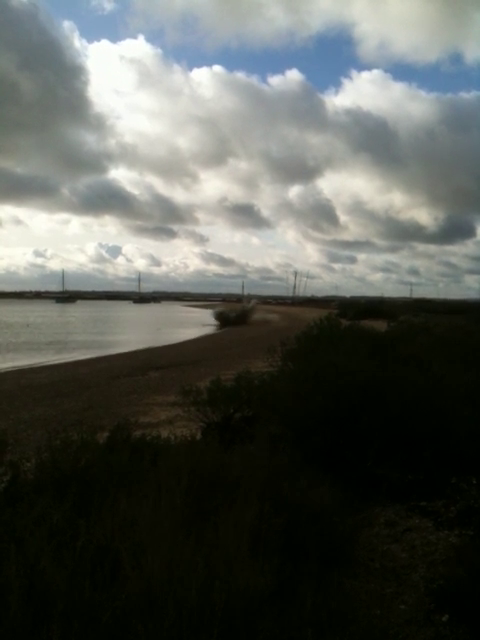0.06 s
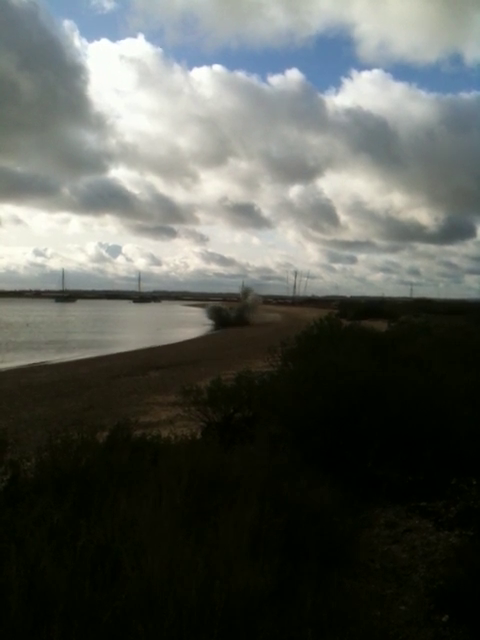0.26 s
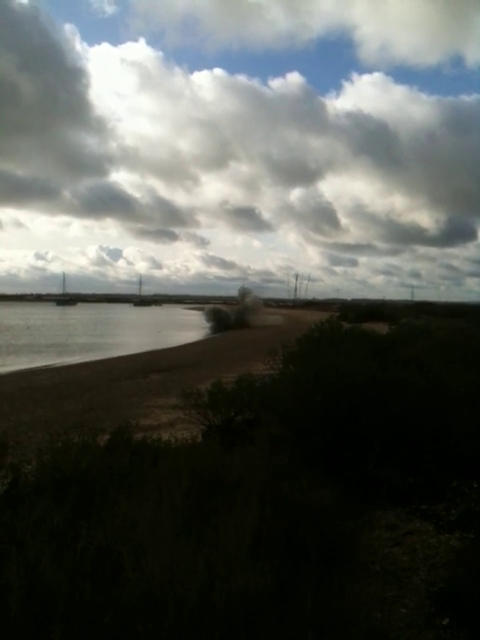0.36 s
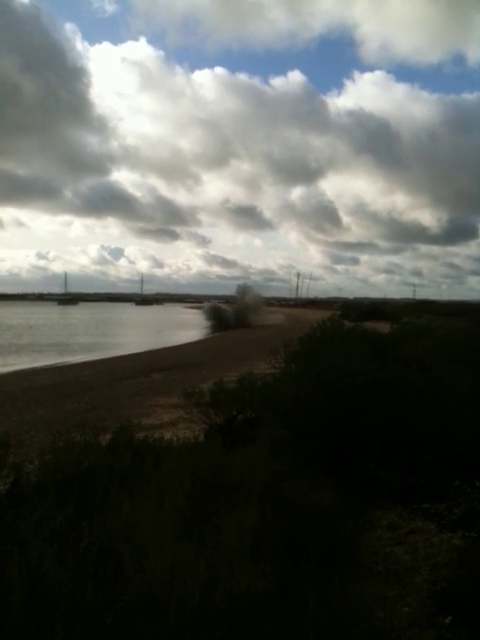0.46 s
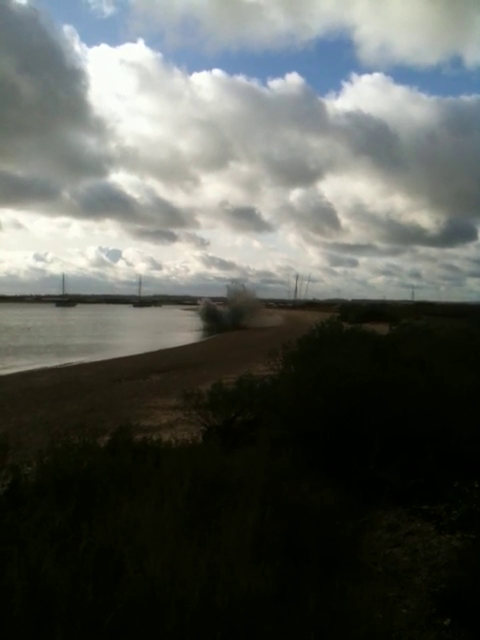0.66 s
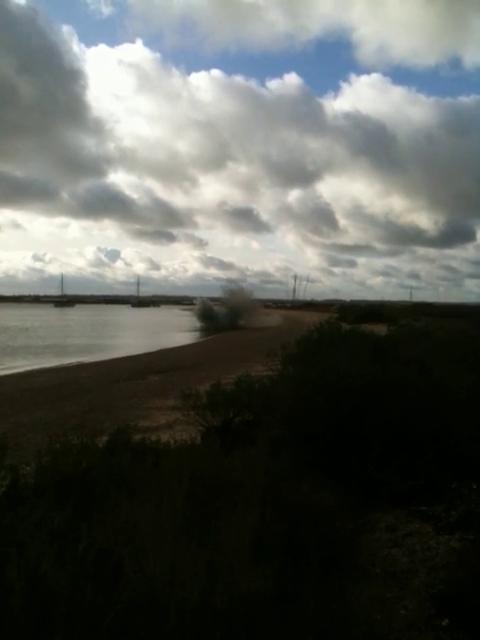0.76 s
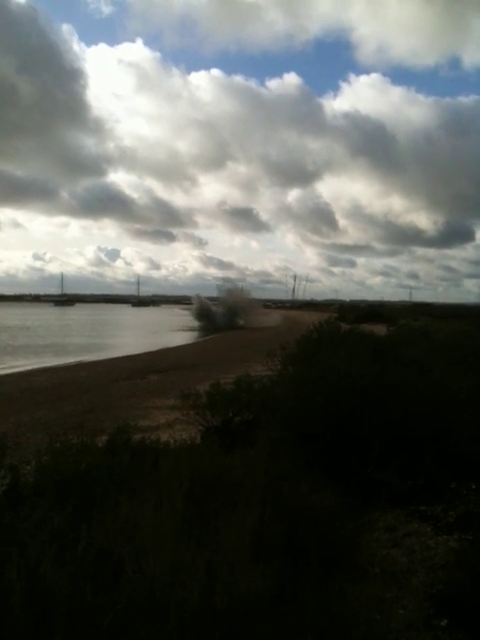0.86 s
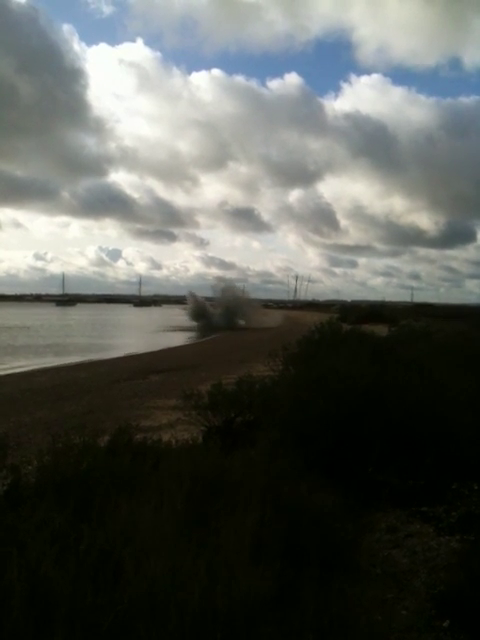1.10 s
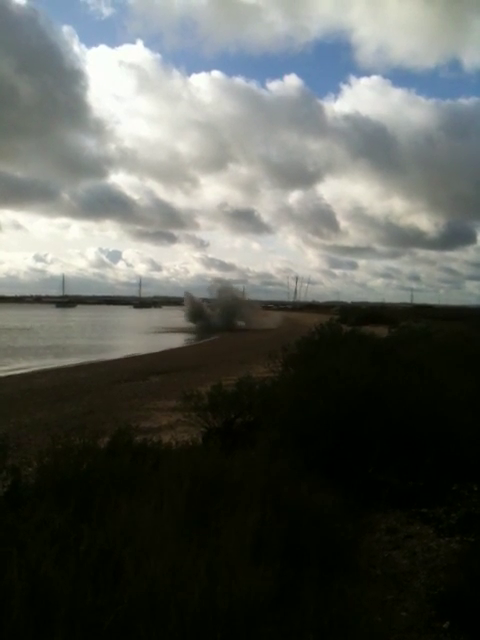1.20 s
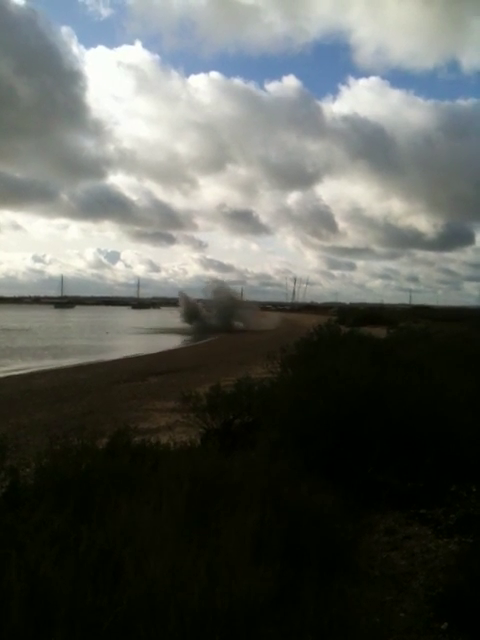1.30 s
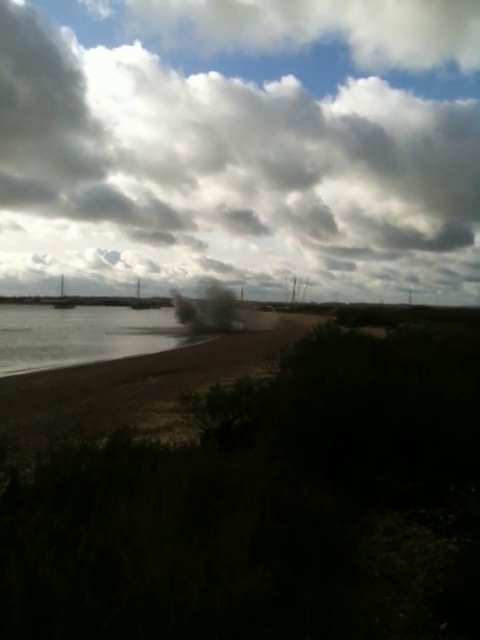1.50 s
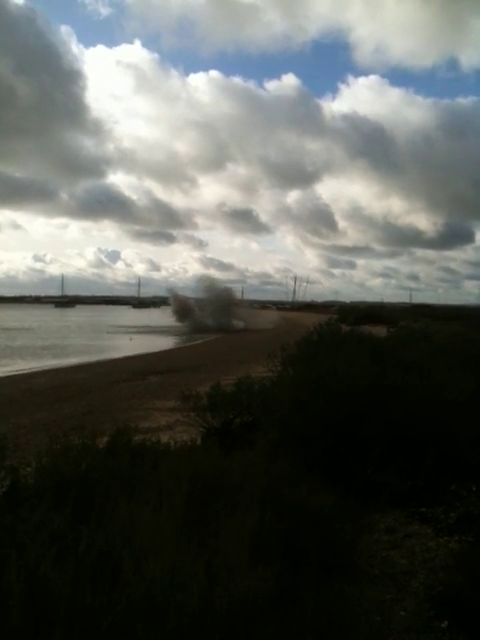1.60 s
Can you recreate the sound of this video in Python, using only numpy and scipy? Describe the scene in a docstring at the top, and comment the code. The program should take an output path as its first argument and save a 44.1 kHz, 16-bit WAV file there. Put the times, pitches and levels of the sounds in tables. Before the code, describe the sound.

Outdoors by the water, one violent distant charge goes off with a clipped, distorted crack and tiny dropouts, then bass booms, rough echoes and a duller, gradually fading roar, caught on a cheap handheld microphone.

```python
"""A charge explodes far down a beach: a burst of wide noise overloads a small microphone over faint wind.
Slow pressure swings pin its capsule against the stops, so the sound drops out.
Shaped noise makes the dense roar and low rumble that roll in from shore and water, mostly duller with time.
Short wave packets make the low booms and single echoes; rough ground trails each echo with quick repeats."""
import sys
import numpy as np
from scipy import signal
from scipy.io import wavfile
from scipy.ndimage import uniform_filter1d

SR = 44100
rng = np.random.default_rng(int(sys.argv[2]) if len(sys.argv) > 2 else 0)


def attenuation_scalar(level_db):
    """Turn a level in dB into a linear amplitude multiplier (20 dB per decade)."""
    decades = np.asarray(level_db, float) / 20
    return 10 ** decades


def output_pcm(signal):
    """Save a mono or channel-first signal as 16-bit PCM at the path in sys.argv[1].

    Samples are clipped to [-1, 1] before scaling.
    """
    pcm = np.clip(np.atleast_2d(signal).T, -1, 1) * 32767
    wavfile.write(sys.argv[1], SR, np.round(pcm).astype(np.int16))


N = 72765  # length in samples
BLAST_START_S = .2297
TRAVEL = .7  # signal level at which the capsule meets its stop


def evened(x):
    """Scales a signal to an rms of 1."""
    return x / np.sqrt(np.mean(x ** 2) + 1e-20)


def curve(points, t):
    """Reads a breakpoint curve in straight lines over time."""
    return np.interp(t, *np.transpose(points))


def tone(points, hz):
    """Reads a spectrum in straight lines of dB over log frequency."""
    f, db = np.transpose(points)
    return np.interp(np.log(hz + 1), np.log(f + 1), db)


def noise(shape_db, size, patchy_db, source=None):
    """Noise of rms 1, coloured by shape_db(hz, s) and mottled by random loud and weak patches."""
    x = rng.standard_normal(N) if source is None else source
    overlap = size * 3 // 4
    hz, s, spectra = signal.stft(x, SR, nperseg=size, noverlap=overlap)
    field = attenuation_scalar(shape_db(hz[:, None], s[None]) + 0 * s)
    field = field / np.sqrt((field ** 2).mean(0))  # colour alone, equal power at each moment
    patches = uniform_filter1d(rng.standard_normal(spectra.shape), 5, axis=0)
    patches = evened(uniform_filter1d(patches, 6, axis=1))
    coloured = spectra * field * attenuation_scalar(patchy_db * patches)
    return evened(signal.istft(coloured, SR, nperseg=size, noverlap=overlap)[1][:N])


def bursts(rows):
    """Short wave packets: sines under bell-shaped envelopes, a few cycles long."""
    out = np.zeros(N)
    for centre_s, peak_db, pitch_hz, cycles in rows:
        half = round(1.5 * cycles / pitch_hz * SR)
        phase = np.arange(-half, half) * pitch_hz / SR  # in cycles
        # the second term makes up for the lower sine peaks of very short packets
        bell = np.exp(-(2 * phase / cycles) ** 2 + 0.14 / cycles ** 2)
        begin = round(centre_s * SR) - half
        out[begin:][:2 * half] += attenuation_scalar(peak_db) * bell * np.sin(2 * np.pi * phase)
    return out


# colour of the wind: pitch_hz [Hz], level_db [dB per Hz, relative]
WIND_TONE = [(24, -53), (60, -0.5), (156, 1), (650, -27), (933, -15.5), (1200, -30), (1500, -20),
             (1640, -27.5), (9000, -41), (12500, -43), (19800, -120)]
# soft wind bumps: centre_s [s], peak_db [dB], pitch_hz [Hz], length [cycles]
WIND_BUMPS = [(.043, -43.5, 323, 1.1), (.052, -39, 167, 1.9), (.113, -49, 186, 3.2)]


def wind():
    """Steady faint wind noise, with a few low bumps as wave packets."""
    level_db = -54
    steady = noise(lambda hz, s: tone(WIND_TONE, hz), size=1024, patchy_db=0.5)
    return attenuation_scalar(level_db) * steady + bursts(WIND_BUMPS)


# colour of the direct blast: pitch_hz [Hz], level_db [dB per Hz, relative]
FRONT_TONE = [(40, -1), (400, -7), (1300, 4), (2200, 0), (3900, 3.5), (6000, -6), (10000, -4),
              (16000, -44.5)]


def front(t):
    """The direct blast: very loud wide noise that stops as the pressure swing arrives."""
    level_db, end_s, fall_s = -1, .2722, .0008
    shape = (t > BLAST_START_S) * np.exp(-np.maximum(t - end_s, 0) / fall_s)
    return attenuation_scalar(level_db) * shape * noise(lambda hz, s: tone(FRONT_TONE, hz), size=256, patchy_db=3.5)


# loudness of the roar: time_s [s], level_db [dB]
ROAR_LEVEL = [(.325, -10.5), (.345, -10), (.41, -12.5), (.5, -16.5), (.58, -19), (.622, -21), (.65, -22.5),
              (.755, -25), (.88, -23.5), (.945, -24), (1., -29.5), (1.07, -26), (1.12, -25.5), (1.147, -22),
              (1.165, -26), (1.2, -21.5), (1.223, -26.5), (1.4, -29.5), (1.557, -29.5), (1.583, -32.5),
              (1.65, -37)]
# colour of the bright roar: pitch_hz [Hz], level_db [dB per Hz, relative]
ROAR_EARLY_TONE = [(240, -28), (400, -5), (616, -16), (753, 0.5), (921, -6), (2220, -0.5), (2590, -6),
                   (4440, -6.5), (9610, -17), (16000, -21.5)]
# colour of the dull roar: pitch_hz [Hz], level_db [dB per Hz, relative]
ROAR_LATE_TONE = [(240, -1.5), (400, 4), (880, -3), (1150, -1), (2150, -12), (3400, -17.5), (5000, -32.5),
                  (8000, -46), (11000, -47.5), (16000, -98)]
# drift between the two colours: time_s [s], mix [0 early to 1 late]
DULLING = [(.3, -0.25), (.42, 0.32), (.55, 0.55), (.72, 0.59), (.88, 0.33), (1.05, 0.67), (1.35, 0.74),
           (1.65, 0.87)]


def roar(t):
    """Dense echoes plus scattered louder ones; the air takes more treble the longer the path."""
    scatter_per_s, scatter_db, spread_db = 1600, -3, 2.5
    air_db_per_s, air_hz = -7.5, 10000  # extra treble loss, as it is at air_hz
    hits = (rng.random(N) < scatter_per_s / SR) * rng.choice([-1, 1], N)
    sparse = hits * attenuation_scalar(spread_db * np.minimum(rng.exponential(1, N), 4))
    drive = rng.standard_normal(N) + attenuation_scalar(scatter_db) * evened(sparse)

    def shape(hz, s):
        early, late = tone(ROAR_EARLY_TONE, hz), tone(ROAR_LATE_TONE, hz)
        air_loss = air_db_per_s * (s - BLAST_START_S) * (hz / air_hz) ** 4
        return early + curve(DULLING, s) * (late - early) + air_loss

    echoing = noise(shape, size=256, patchy_db=2.0, source=drive)
    return (t > BLAST_START_S) * attenuation_scalar(curve(ROAR_LEVEL, t)) * echoing


# slow pressure on the capsule: time_s [s], pressure [capsule travels]
PRESSURE = [(.23, 0), (.27, .1), (.2742, 1.8), (.2806, 1.8), (.2814, .6), (.2822, 1), (.2843, .7),
            (.2857, -2.5), (.3048, -2.5), (.3064, .4), (.3075, -.4), (.3098, -.5), (.3106, .4),
            (.3125, -.9), (.3132, -2.2), (.3162, -2.2), (.3178, 2.5), (.3243, 2.5), (.3262, -1.3),
            (.3295, -1.2), (.333, -.2), (.42, 0)]
# later swells that together push past the stop: centre_s [s], length_s [s], height [capsule travels]
PRESSURE_SWELLS = [(1.106, .2, .5), (1.0945, .008, 1.1), (1.102, .009, 1.), (1.11, .008, 1.1),
                   (1.119, .007, 1.), (1.265, .12, .7), (1.265, .006, .5)]


def heave(t):
    """Slow pressure swings, smoothed at their corners, plus later rounded swells."""
    swells = np.zeros(N)
    for centre_s, length_s, height in PRESSURE_SWELLS:
        swells += height * np.cos(np.pi * np.clip((t - centre_s) / length_s, -.5, .5)) ** 2
    return TRAVEL * (uniform_filter1d(curve(PRESSURE, t), size=20) + swells)


# loudness of the rumble: time_s [s], level_db [dB]
RUMBLE_LEVEL = [(0.33, -3.5), (0.374, -6), (0.394, -8), (0.43, -14), (0.454, -16.5), (0.528, -17),
                (0.558, -22), (0.57, -22), (0.754, -18), (0.9, -16), (1.04, -24), (1.13, -18),
                (1.155, -22.5), (1.412, -23.5), (1.43, -32), (1.492, -21), (1.626, -35), (1.65, -18)]
# colour of the rumble: pitch_hz [Hz], level_db [dB per Hz, relative]
RUMBLE_COLOUR = [(20, -11), (55, 10), (90, 15), (165, 6), (250, -0.5), (400, -4.5), (600, -39), (900, -68)]


def rumble(t):
    """The low roll of the blast: bass noise that fades in quickly and follows a level curve."""
    start_s, fade_s = .328, 0.016
    fade = np.clip((t - start_s) / fade_s, 0, 1)
    low_roll = noise(lambda hz, s: tone(RUMBLE_COLOUR, hz), size=2048, patchy_db=2)
    return fade * attenuation_scalar(curve(RUMBLE_LEVEL, t)) * low_roll


# low returns of the blast: centre_s [s], peak_db [dB], pitch_hz [Hz], length [cycles]
BOOM_RETURNS = [(.367, -9, 168, 4.3), (.422, -14.5, 191, 5), (.526, -11.5, 167, 4.9), (.577, -13, 163, 1.8),
                (1.134, -11.5, 173, 3.6)]


def booms():
    """Low returns of the blast as short bass wave packets."""
    return bursts(BOOM_RETURNS)


# single echoes before roughening: centre_s [s], peak_db [dB], pitch_hz [Hz], length [cycles]
SINGLE_ECHOES = [(.611, 0, 2680, 0.99), (.6112, -13, 8200, 1.1), (.612, -6.5, 1200, 2.5),
                 (.6218, -19, 3600, 1.5), (.6258, -14.5, 1420, 2.6), (.951, -16, 905, 5.3),
                 (1.064, -13, 1600, 1.7), (1.142, -16.5, 796, 6.2), (1.1455, -15, 610, 1.6),
                 (1.1475, -5, 745, 1.4), (1.1803, -13.5, 1100, 4.2), (1.1845, -14, 940, 1.3),
                 (1.1995, -14, 1130, 5.2), (1.2045, -11, 1260, 1.1), (1.2075, -36, 3280, 1.7),
                 (1.376, -21, 1690, 2.4), (1.382, -17, 1850, 2.9), (1.456, -33, 4600, 3.2),
                 (1.4622, -14.5, 1670, 2.3), (1.4885, -32, 4270, 3.5), (1.4955, -13.5, 3000, 0.81),
                 (1.5058, -16, 1440, 0.95), (1.5185, -43, 1800, 1.3), (1.5555, -23, 1500, 3.2),
                 (1.56, -11.5, 1680, 3)]


def echoes():
    """Single echoes, roughened in level; rough ground trails each with quick scattered repeats."""
    grit, grit_hz = 0.26, 1500  # rms depth and top frequency of the roughness
    smear_t60_s, smear_db, smear_per_s = 0.093, -6, 1100
    lowpass = signal.butter(4, grit_hz, fs=SR)
    roughness = evened(signal.lfilter(*lowpass, rng.standard_normal(N)))
    clean = bursts(SINGLE_ECHOES) * (1 + grit * roughness)
    t = np.arange(2000) / SR
    taps = (rng.random(len(t)) < smear_per_s / SR) * rng.standard_normal(len(t))
    taps = taps * attenuation_scalar(-60 * t / smear_t60_s) * (t > .0005)
    return clean + attenuation_scalar(smear_db) * signal.oaconvolve(clean, taps / np.linalg.norm(taps))[:N]


def scene():
    """Sums the wind, the blast, its pressure swings and all its returns at the capsule."""
    t = np.arange(N) / SR
    background = wind()
    blast = front(t) + roar(t) + heave(t)
    returns = rumble(t) + booms() + echoes()
    return (background + blast + returns)[None]


def roll_off(x):
    """The treble ends steeply here."""
    return signal.sosfilt(signal.butter(12, 16900, fs=SR, output="sos"), x)


def record(dry):
    """The capsule stops at its travel, a steep low cut rings after each jolt, the converter clips."""
    low_cut_hz, leak_db, ceiling, edge_hz = 163, -34, .68, 16400
    pinned = np.clip(dry, -TRAVEL, TRAVEL)
    low_cut = signal.butter(4, low_cut_hz, "high", fs=SR, output="sos")
    cut = signal.sosfilt(low_cut, pinned) + attenuation_scalar(leak_db) * pinned  # deep bass slips past the cut
    clipped = np.clip(cut, -ceiling, ceiling)
    treble_edge = signal.firwin(255, edge_hz, window=("kaiser", 9), fs=SR)[None]
    return roll_off(signal.oaconvolve(clipped, treble_edge, "same"))


dry = scene()
out = record(dry)
output_pcm(out)
```